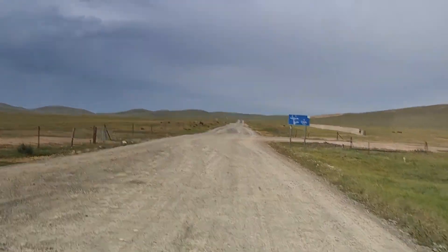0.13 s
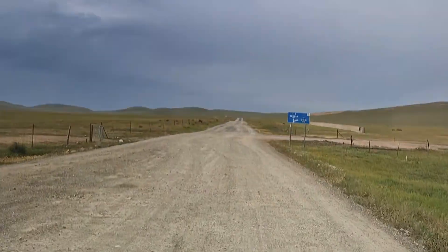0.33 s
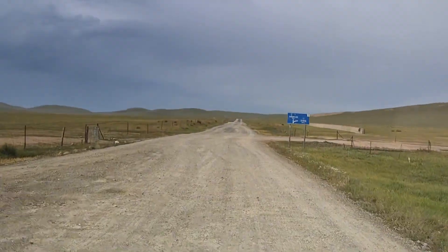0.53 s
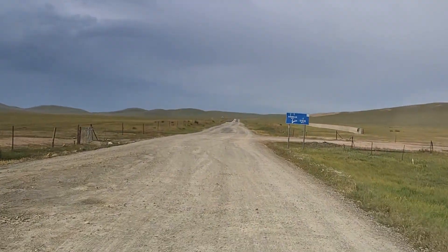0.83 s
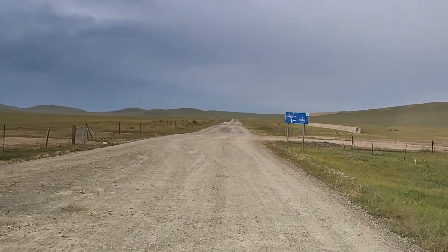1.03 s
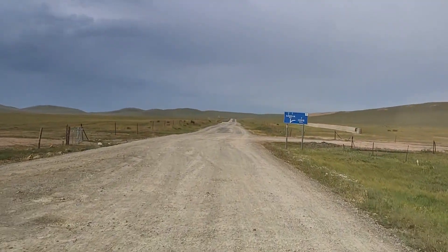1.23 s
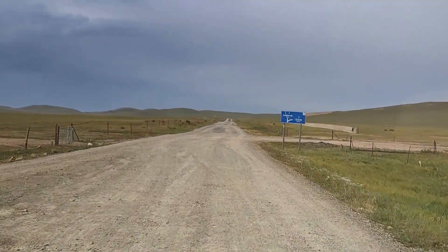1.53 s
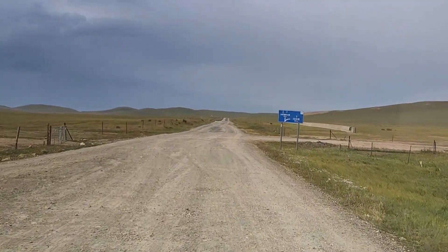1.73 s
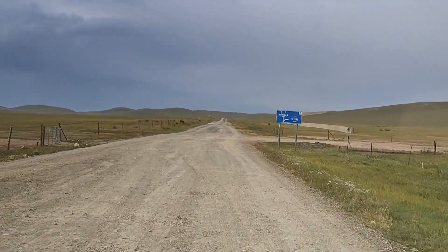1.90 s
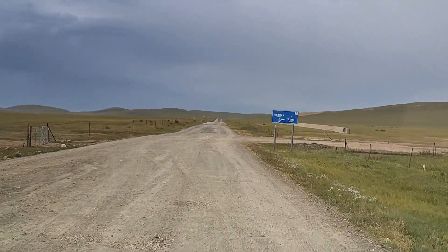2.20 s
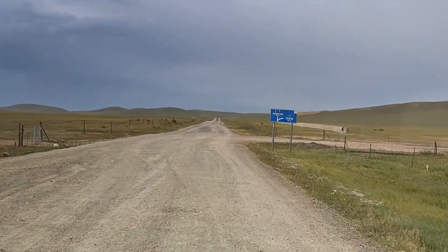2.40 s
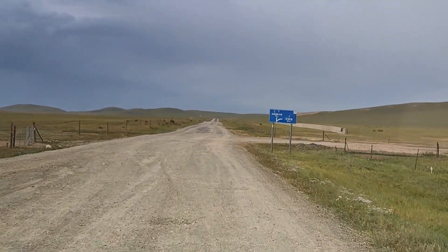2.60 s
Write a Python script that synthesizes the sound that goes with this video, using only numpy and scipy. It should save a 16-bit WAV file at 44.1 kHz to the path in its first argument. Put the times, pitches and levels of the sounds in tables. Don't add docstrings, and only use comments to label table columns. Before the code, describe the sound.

Loud low rumble inside a vehicle driving on rough gravel, engine humming, stones clattering, panels knocking

```python
import sys
import numpy as np
from scipy import signal
from scipy.fft import rfft, irfft, next_fast_len
from scipy.io import wavfile
from scipy.ndimage import uniform_filter1d, minimum_filter1d, map_coordinates

SR = 44100
rng = np.random.default_rng(int(sys.argv[2]) if len(sys.argv) > 2 else 0)


def decibels_to_gain(level_db):
    exponent = np.asarray(level_db, float) / 20
    return 10 ** exponent


def to_wav(sig):
    pcm = np.clip(np.atleast_2d(sig), -1, 1) * 32767
    pcm = np.round(pcm).astype(np.int16)
    wavfile.write(sys.argv[1], SR, pcm.T)


N = 121275

# t/s, peak level/dB, pan/dB (left over right)
JINGLE_EVENTS = [(0.104, -24, 0.5), (0.1353, -18, 4), (0.4707, -15, 9), (0.4765, -10.5, 4),
                 (0.4875, -46, -3), (0.6924, -19, 4), (0.706, -30, -1), (0.725, -34, -2), (0.894, -22.5, 6),
                 (0.912, -25, -5), (1.1717, -26, 12), (1.1992, -24, 2.5), (2.4874, -22, 0), (2.497, -27, 5),
                 (2.53, -22, -3), (2.5686, -29, -3)]
PANEL_FOLLOWS = 0.76


def unit(x):
    return x / np.sqrt(np.mean(x ** 2) + 1e-20)


def along(points, hz):
    f, v = np.transpose(points)
    return np.interp(np.log(hz + 1), np.log(f + 1), v)


def curve(rows):
    return np.interp(np.arange(N) / SR, *np.transpose(rows))


def wobble(rate_hz):
    knots = rng.standard_normal(int(N * rate_hz / SR) + 4)
    return map_coordinates(knots, [np.arange(N) * rate_hz / SR])


def filtered(x, response):
    m = next_fast_len(N + 8192)
    x = np.pad(x, [(0, 0), (4096, m - N - 4096)], mode="reflect")
    return irfft(rfft(x) * response(np.fft.rfftfreq(m, 1 / SR)), m)[:, 4096:4096 + N]


def spread(pair):
    # f/Hz, correlation
    likeness = [(40, 0.98), (150, 0.99), (270, 0.92), (470, 0.65), (600, 0.058), (1200, -0.12),
                (2400, -0.057), (15000, -0.23)]

    def mid_and_side(hz):
        turn = np.arccos(np.clip(along(likeness, hz), -1, 1)) / 2
        return np.array([np.cos(turn), np.sin(turn)])

    mid, side = filtered(pair, mid_and_side)
    return np.array([mid + side, mid - side])


def panned(db, pan_db):
    return decibels_to_gain(db + np.array([[pan_db], [-pan_db]]) / 2)


def rush(spectrum, patchy_db=0):
    z = signal.stft(rng.standard_normal((2, N)), nperseg=512)[2]
    field = uniform_filter1d(rng.standard_normal(z.shape[1:]), size=8, axis=0)
    field = uniform_filter1d(field, size=5, axis=1)
    pair = signal.istft(z * decibels_to_gain(patchy_db * unit(field)), nperseg=512)[1][:, :N]
    return unit(filtered(pair, lambda hz: decibels_to_gain(along(spectrum, hz))))


def bursts(events, spectrum, hold_s, t60_s, gain_db, rise_s, grainy_db):
    tail_db, tail_slower = -28, 6.9
    shape, t = np.zeros((2, N + SR)), np.arange(SR // 4) / SR
    decay = decibels_to_gain(-60 * np.maximum(t - hold_s, 0) / t60_s)
    tail = decibels_to_gain(tail_db - 60 * t / (tail_slower * t60_s))
    envelope = (1 - np.exp(-t / rise_s)) * (decay + tail)
    for s, db, pan_db in events:
        start = max(round((s - 2 * rise_s) * SR), 0)
        shape[:, start:start + len(t)] += panned(db + gain_db, pan_db) * envelope
    noise = rush(spectrum, patchy_db=-0.5)
    noise = noise / np.sqrt(abs(uniform_filter1d(noise ** 2, size=300, axis=1)) + 1e-6)
    return shape[:, :N] * unit(decibels_to_gain(grainy_db * wobble(400))) * noise


def turns():
    # t/s, f/Hz
    shaft = [(0, 23.3), (.55, 23.72), (1.03, 24.06), (1.46, 24.36), (1.89, 24.54), (2.3, 24.72),
             (2.75, 24.9)]
    tick_at_s = 1.2346
    angle = np.cumsum(curve(shaft)) / SR
    return angle - angle[round(tick_at_s * SR)]


def boom():
    # f/Hz, level/dB
    boom_spectrum = [(10, -25), (20, -8), (40, -4), (70, -5), (130, -3), (200, -5), (280, -25), (600, -64)]
    return spread(decibels_to_gain(-13 + 0.077 * wobble(5.3)) * rush(boom_spectrum))


def engine_hum(angle):
    # multiple of shaft speed, rms level/dB
    orders = [(1, -29.5), (2, -14), (3, -19.5), (4, -16), (5, -28), (6, -23), (7, -23.5), (8, -22.5),
              (9, -26), (10, -23.5), (11, -26.5), (12, -28), (14, -31.5), (15, -34), (19, -33), (20, -39),
              (22, -39.5)]
    # t/s, level/dB
    load = [(0, -1.5), (.5, -0.5), (1.2, -1), (1.7, -2.5), (2.2, 1), (2.75, -2)]
    wander_db, drift_rad = 1, 0.48
    load_db, hum = curve(load), np.zeros(N)
    for k, db in orders:
        level = decibels_to_gain(db + load_db + wander_db * wobble(4.984)) * np.sqrt(2)
        phase = drift_rad * wobble(3.115) + rng.uniform(0, 2 * np.pi)
        hum += level * np.cos(2 * np.pi * k * angle + phase)
    return hum


def engine_thump(angle):
    # f/Hz, level/dB
    thump_spectrum = [(120, -42), (200, -9.5), (280, 2), (350, -1.5), (426, -8), (478, -7), (560, -12),
                      (640, -47)]
    level_db, depth_db, peak_turn = -18.5, 6.5, 0.13
    beat_db = depth_db * np.cos(2 * np.pi * (angle - peak_turn)) + 0.17 * wobble(20.95)
    return spread(decibels_to_gain(level_db) * unit(decibels_to_gain(beat_db)) * rush(thump_spectrum, patchy_db=0.6))


def valve_ticks(angle):
    # t/s, level over the others/dB
    hard_ticks = [
        (.986, 3),
        (1.235, 8),
        (1.399, 7),
        (1.686, 10),
        (1.971, 7),
        (2.376, 13),
        (2.417, 12),
        (2.498, 14),
    ]
    tick_hz, t60_s, rise_s, level_db, scatter_db = 6360, 0.0093, 0.00015, -43.5, 1.5
    at = np.flatnonzero(np.diff(np.floor(angle)))
    hard_db = sum(db * (abs(at / SR - s) < 1 / 100) for s, db in hard_ticks)
    level = decibels_to_gain(level_db + hard_db + scatter_db * rng.standard_normal(len(at))) * np.sqrt(2)
    pan_rad = rng.uniform(np.pi / 8, 3 * np.pi / 8, len(at))
    ticks = np.zeros((2, N))
    ticks[:, at] = level * np.array([np.cos(pan_rad), np.sin(pan_rad)])
    t = np.arange(SR // 50) / SR
    ring = np.sin(2 * np.pi * tick_hz * t) * decibels_to_gain(-60 * t / t60_s) * (1 - np.exp(-t / rise_s)) * 2
    return signal.fftconvolve(ticks, ring[None], axes=1)[:, :N]


def engine():
    angle = turns()
    return engine_hum(angle) + engine_thump(angle) + valve_ticks(angle)


def pings(rough_db):
    pings_per_s, middle_hz, lowest_hz, highest_hz = 400, 2300, 1500, 9000
    pitch_spread, cycles, level_db, sizes_db, most_db = 0.76, 2, -32, 2.5, 9
    count = int(pings_per_s * N / SR)
    at, pitch, size, side = rng.random((count, 4)).T
    hz = middle_hz * np.exp(pitch_spread * np.log(pitch / (1 - pitch)))
    hz = np.clip(hz, lowest_hz, highest_hz)[:, None]
    t, start = np.arange(SR // 50) / SR, (at * N).astype(int)
    grain = np.sin(2 * np.pi * hz * t) * np.exp(-3 * t * hz / cycles) * (middle_hz / hz)
    size_db = np.minimum(-sizes_db * np.log(size), most_db)
    grain = grain * decibels_to_gain(level_db + size_db + rough_db[start])[:, None]
    where = (start[:, None] + np.arange(len(t))).ravel()
    return np.array([np.bincount(where, (grain * gain[:, None]).ravel(), N + SR)[:N]
                     for gain in (np.cos(side * np.pi / 2), np.sin(side * np.pi / 2))])


def road():
    # f/Hz, level/dB
    panel_spectrum = [(300, -54), (520, 0.5), (730, 1.5), (1000, -0.5), (1550, -9.5), (2090, -10.5),
                      (3000, -26.5), (4500, -59)]
    # f/Hz, level/dB
    gravel_spectrum = [(1200, -7.5), (2500, 6.5), (4300, 3.5), (6500, -2.5), (7500, -14), (10000, -30),
                       (16000, -50)]
    # t/s, level/dB
    roughness = [(0.0, -40.5), (0.57, -38), (0.88, -39.5), (1.35, -39.5), (1.61, -40), (2.65, -39.5),
                 (2.75, -39.5)]
    panel_level_db, beat_depth_db, beat_turn = -28.5, 1.5, 0.97
    level_db, shared = curve(roughness), wobble(14)
    rough_db = PANEL_FOLLOWS * (level_db - level_db.mean())
    beat_db = beat_depth_db * np.cos(2 * np.pi * (turns() - beat_turn))
    panel_db = panel_level_db + rough_db + beat_db + 0.42 * shared + 1.2 * wobble(43.77)
    panel = decibels_to_gain(panel_db) * rush(panel_spectrum, patchy_db=-0.5)
    gravel_db = level_db + 1.0 + 0.18 * beat_db + 0.22 * shared + 0.33 * wobble(39.6)
    gravel = decibels_to_gain(gravel_db) * rush(gravel_spectrum, patchy_db=2.5)
    return spread(panel + gravel) + pings(rough_db)


def ruts():
    # t/s, peak level/dB, heave f/Hz
    rut_events = [(0.119, -12, 136.2), (0.199, -1, 25.8), (0.273, -12.5, 302), (0.28, -35, 120),
                  (0.46, -8, 27), (0.49, -4.5, 79), (0.507, -12, 169.9), (0.534, -7, 104.8),
                  (0.624, -7, 194.6), (0.767, -10, 208.2), (0.853, -9.5, 112.6), (0.998, -12, 32),
                  (1.39, -21, 95.7), (1.412, -11, 48.3), (1.463, -6, 72), (1.517, -7, 170.4),
                  (1.543, -9.5, 65.6), (1.64, -14, 183.5), (1.674, -3.5, 37), (1.757, -4.5, 86),
                  (1.891, -6, 88), (1.994, -7.5, 85.4), (2.062, -8, 58), (2.206, -3, 67.5),
                  (2.26, -4.5, 37), (2.315, -8, 83), (2.393, -14, 146), (2.475, -2.5, 62.6)]
    rise_s, t60_s, gain_db = 0.013, .2, 7.5
    heave, t = np.zeros(N + SR), np.arange(SR // 2) / SR
    envelope = decibels_to_gain(-60 * t / t60_s) * (1 - np.exp(-(t / rise_s) ** 2))
    for s, db, hz in rut_events:
        phase = rng.uniform(0, 2 * np.pi)
        heave[round(s * SR):][:len(t)] += decibels_to_gain(db + gain_db) * envelope * np.sin(2 * np.pi * hz * t + phase)
    return heave[:N]


def loose_metal():
    # f/Hz, level/dB
    jingle_spectrum = [(2200, -46), (3500, -8), (6500, 3), (8000, -5.5), (9600, -7), (10400, -1.5),
                       (15400, -13), (16200, -30)]
    # t/s, level/dB
    unrest = [(0.0, -48.5), (.5, -38.5), (1, -55), (1.4, -70.5), (1.94, -74), (2.3, -44), (2.52, -45.5),
              (2.75, -76)]
    shimmer_db = curve(unrest) - 7.0 + 5.0 * wobble(7.8) + 0.74 * wobble(37)
    shimmer = decibels_to_gain(shimmer_db) * rush(jingle_spectrum, patchy_db=-2.0)
    return shimmer + bursts(JINGLE_EVENTS, jingle_spectrum, hold_s=.002, t60_s=.07, gain_db=-16.5,
                            rise_s=0.0004, grainy_db=4)


def rings():
    low_hz, high_hz, t60_s, gain_db = 7500, 15400, .16, -27.5
    out, t = np.zeros((2, N + SR)), np.arange(SR // 4) / SR
    for s, db, pan_db in JINGLE_EVENTS:
        pitch, length = rng.random((2, 8, 1))
        hz = low_hz + (high_hz - low_hz) * pitch
        partials = np.sin(2 * np.pi * hz * t) * decibels_to_gain(-60 * t / (t60_s * (.5 + length)))
        out[:, round(s * SR):][:, :len(t)] += panned(db + gain_db, pan_db) * partials.sum(axis=0)
    return out[:, :N]


def stones():
    # t/s, peak level/dB, pan/dB
    stone_events = [(0.148, -22, 5), (0.302, -17.5, -3), (0.3561, -25.5, -6), (0.4712, -21, -4),
                    (0.4783, -17, -1.0), (0.4855, -19, -3), (0.4925, -32, 6), (0.5287, -25, 2.5),
                    (0.5894, -24, -3), (0.618, -29.5, 7), (0.6336, -16, -1), (0.6544, -25, 1.0),
                    (0.775, -21.5, -8), (0.8193, -20, 1), (0.863, -36, 0), (0.896, -35, 2),
                    (1.1109, -26.5, 1.0), (1.5494, -28, 3), (1.6094, -28, 0), (1.626, -39, 0),
                    (1.6427, -34, -7), (1.832, -40, -9), (1.8378, -23, -7), (1.8434, -35, 3),
                    (1.851, -28, 0), (2.138, -24.5, 5), (2.386, -23, -7), (2.4094, -30, -3),
                    (2.495, -18.5, -5), (2.535, -25, -3), (2.5686, -22, -4), (2.578, -35, 0)]
    # f/Hz, level/dB
    stone_spectrum = [(1000, -41), (2000, 13), (2700, 13.5), (4300, 15), (6500, 7), (9000, -5.5),
                      (14000, -16), (16000, -39)]
    return bursts(stone_events, stone_spectrum, hold_s=.002, t60_s=.035, gain_db=-6,
                  rise_s=0.0013, grainy_db=4)


def trim_knocks():
    # t/s, peak level/dB, pan/dB
    knock_events = [(0.102, -26, 11), (0.151, -13, 2), (0.232, -19, 6), (0.28, -11, -5), (0.358, -40, -4),
                    (0.396, -22, -5), (0.479, -12, 0), (0.548, -16.5, 1), (0.639, -7.5, 6.5),
                    (0.731, -19.5, -5), (0.808, -23, 5), (0.984, -23, -7), (1.14, -13, 7), (1.267, -19, -2),
                    (1.298, -14.5, 4), (1.436, -12, 6), (1.463, -14, 4), (1.546, -9, 1), (1.6, -9.5, 3),
                    (1.719, -13.5, -8), (2.088, -12, -7), (2.171, -16, -1), (2.404, -16, -11),
                    (2.518, -10.5, 2), (2.536, -11, 3), (2.611, -21, 7), (2.6445, -8, 6), (2.652, -32, -2),
                    (2.699, -19, -7)]
    # f/Hz, level/dB
    knock_spectrum = [(450, -43), (750, 20), (1000, 11), (1400, 4), (1900, 4.5), (2800, -7.5), (5000, -25),
                      (9000, -70)]
    return bursts(knock_events, knock_spectrum, hold_s=.004, t60_s=.05, gain_db=-10,
                  rise_s=0.0014, grainy_db=3.5)


def scene():
    body = boom() + engine() + road() + ruts()
    return body + rings() + loose_metal() + stones() + trim_knocks()


def thinned(x):
    # f/Hz, level over the usual/dB
    dropped = [(8000, -27.5), (12000, -22), (13500, 1.5), (14000, 8), (14600, 4), (15500, 3), (16100, 60)]
    # f/Hz, chance
    holes = [(4000, 0), (6000, 0.0065), (8000, .1), (9700, 0.44), (11500, 0.48), (14000, 0.12)]
    line_bar_db, line_from_hz = -2, 8500
    padded = np.pad(x, [(0, 0), (2048, 2048)], mode="reflect")
    hz, _, z = signal.stft(padded, SR, nperseg=2048)
    z, hz = z[:, :1024], hz[:1024]
    power = (abs(z) ** 2).reshape(2, 64, 16, -1).mean(axis=(0, 2))
    band = np.repeat(np.sqrt(power), 16, axis=0)
    luck = np.repeat(rng.random((64, z.shape[2])), 16, axis=0)
    luck = np.repeat(luck, 2, axis=1)[:, :z.shape[2]]
    usual = np.median(band, axis=1)[:, None]
    loud_band = band > usual * decibels_to_gain(along(dropped, hz))[:, None]
    lucky_band = luck > along(holes, hz)[:, None] * usual / (band + 1e-12)
    strong_line = abs(z) > band * decibels_to_gain(line_bar_db)
    spared = (hz < line_from_hz)[:, None] | (band > 2 * usual)
    keep = loud_band & lucky_band & (strong_line | spared)
    z = np.pad(z * keep, [(0, 0), (0, 1), (0, 0)])
    return signal.istft(z, SR, nperseg=2048)[1][:, 2048:2048 + N]


def top_cut(x):
    return signal.sosfilt(signal.butter(12, 16000, fs=SR, output="sos"), x)


def record(dry):
    # f/Hz, left over right level/dB
    balance = [(40, -2.3), (190, -.6), (270, -3.5), (370, 6), (470, 6), (600, 0.3), (4000, 0.5),
               (12000, -1)]
    # f/Hz, phase/rad
    right_leads = [(60, .05), (200, .04), (270, -.18), (370, -.4), (430, 0), (480, .4), (600, -.3),
                   (900, 0)]
    ceiling, knee, hold_s, smooth_s, fade_s = 1, 5.6, 0.0024, 0.0094, .002

    def microphones(hz):
        level = decibels_to_gain(along(balance, hz) * [[.5], [-.5]])
        return level * np.exp(along(right_leads, hz) / 2 * [[-1j], [1j]])

    x = filtered(dry, microphones)
    need = np.minimum(1, ceiling / (abs(x).max(axis=0) + 1e-9))
    hold, smooth = round(hold_s * SR), round(smooth_s * SR)
    x = x * uniform_filter1d(minimum_filter1d(need, hold + smooth), smooth)
    x = x / (1 + abs(x / ceiling) ** knee) ** (1 / knee)
    fade = np.sin(np.pi / 2 * np.minimum(np.arange(N)[::-1] / (fade_s * SR), 1))
    return top_cut(thinned(x) * fade)


dry = scene()
out = record(dry)
to_wav(out)
```